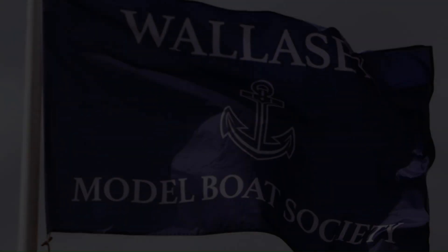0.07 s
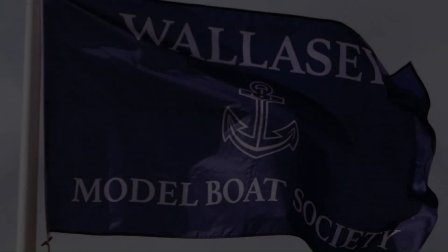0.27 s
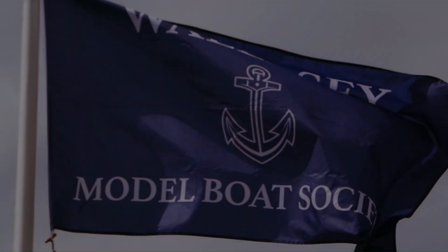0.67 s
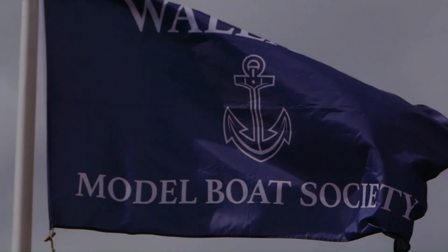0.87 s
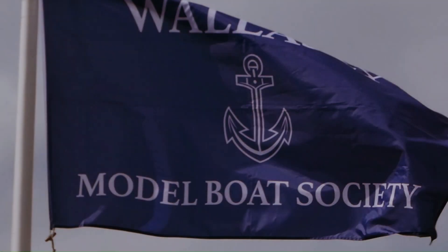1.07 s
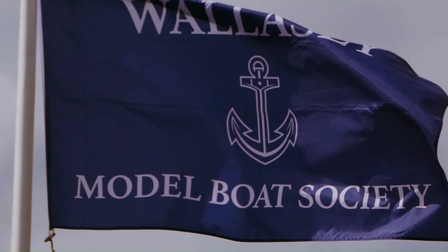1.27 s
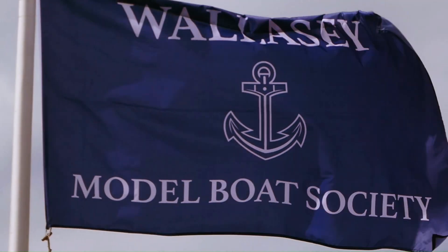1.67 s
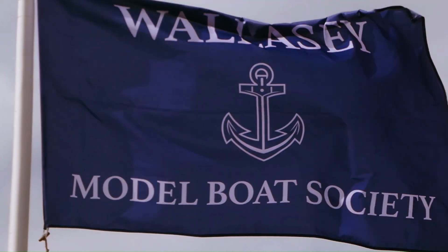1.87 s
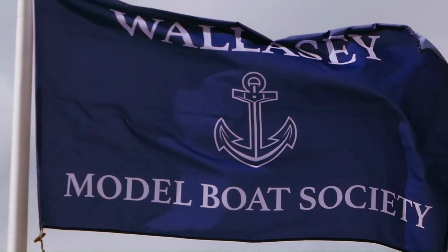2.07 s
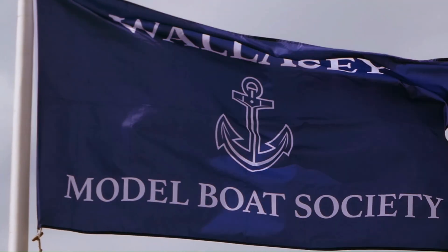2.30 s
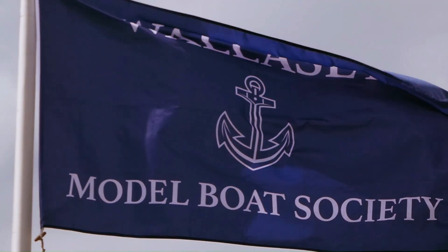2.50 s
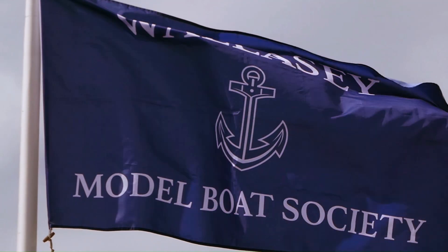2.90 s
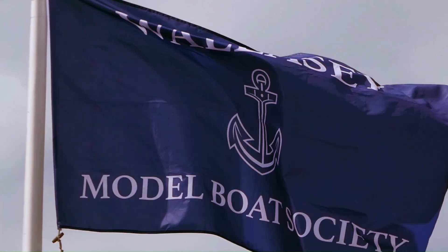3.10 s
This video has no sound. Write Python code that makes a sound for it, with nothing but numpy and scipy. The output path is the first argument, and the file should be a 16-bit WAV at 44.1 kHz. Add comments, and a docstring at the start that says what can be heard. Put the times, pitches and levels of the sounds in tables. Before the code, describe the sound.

A cloth flag flaps close by outdoors, with uneven soft thumps and flutter. It eases briefly, then flutters harder and snaps sharply near the end. Wind rumbles on the microphone under a faint hiss of air.

```python
"""Flag in a gusty wind

Outdoors, close to a cloth flag on its pole; wind buffets the stereo microphone, which pops once.
Each fold that whips taut sends out one pressure pulse (wide = a thump, narrow = a snap), then ripples on.
Small folds flutter in between, the cloth ticks, and air hisses along it.
The surroundings return a faint, dull scatter of the snaps and the flutter."""
import sys
import numpy as np
from scipy import signal
from scipy.io import wavfile

SR = 44100
rng = np.random.default_rng(int(sys.argv[2]) if len(sys.argv) > 2 else 0)


def transcribe(u):
    """Save the signal u as a 16-bit wav file named by the first command-line argument.

    u: samples, shape (n,) or (channels, n), limited to [-1, 1]; the rate is SR.
    q: integer samples, one column per channel.
    """
    v = np.clip(np.atleast_2d(u).T, -1, 1)
    q = np.round(v * 32767).astype(np.int16)
    wavfile.write(sys.argv[1], SR, q)


N = 143325

# Levels in the tables are relative; pan_db is left minus right.
# wind pressure at the microphone: time_s, level_db
GUST_LEVELS = [(0, -39.5), (.1, -46), (.3, -45.5), (.5, -46.5), (.62, -32), (.78, -39.5), (.97, -40.5),
               (1.15, -37), (1.35, -30.5), (1.53, -34.5), (1.68, -51.5), (1.77, -41.5), (2.03, -42.5),
               (2.22, -50), (2.34, -33), (2.42, -37.5), (2.6, -40.5), (2.72, -43), (2.95, -51), (3.14, -55),
               (3.19, -43.5), (3.25, -57)]
# spectrum of the rumble on the microphone: frequency_hz, density_db
RUMBLE_SPECTRUM = [(18, -7.5), (30, -14), (50, -29.5), (90, -21.5), (160, -52.5), (300, -60), (1000, -94),
                   (11000, -110)]
# spectrum of the eddies in strong gusts: frequency_hz, density_db
EDDY_SPECTRUM = [(20, -12), (60, 16.5), (110, -2.5), (200, -9), (400, -17), (1000, -31), (11000, -51)]
# rush of air along the cloth: time_s, level_db
RUSH_LEVELS = [(0, -64), (.2, -61), (.31, -59.5), (.37, -55), (.47, -58.5), (.6, -58.5), (.72, -54.5),
               (.83, -55.5), (.98, -51.5), (1.11, -56), (1.18, -52.5), (1.26, -56.5), (1.32, -53.5),
               (1.43, -56), (1.52, -53.5), (1.68, -61), (1.93, -55.5), (2.08, -59), (2.27, -56.5),
               (2.36, -48.5), (2.47, -53), (2.65, -55), (2.76, -49.5), (2.86, -54.5), (2.93, -52.5),
               (2.952, -41.5), (3.02, -59), (3.17, -57), (3.25, -55.5)]
# spectrum of that rush: frequency_hz, density_db
RUSH_SPECTRUM = [(30, 24), (400, 0), (1000, 5.5), (2000, 1.5), (3500, 1), (5500, -1), (8000, 1),
                 (11000, -2.5)]
# fluttering of the small folds: time_s, level_db
FLUTTER_LEVELS = [(0, -50.5), (.1, -42), (.3, -46), (.37, -34), (.43, -56), (.49, -44), (.56, -55),
                  (.95, -50), (1.08, -42), (1.35, -41.5), (1.58, -49), (1.7, -62), (2.27, -55),
                  (2.35, -26.5), (2.55, -40.5), (2.77, -33.5), (2.9, -30.5), (3.02, -37.5), (3.16, -43.5),
                  (3.25, -42)]
# four sizes of small fold: rise_ms, level_db
SMALL_FOLDS = [(.18, -23.5), (.32, 9.5), (.55, 10), (1.0, 16.5)]
# spectrum of the rustle under the flutter: frequency_hz, density_db
RUSTLE_SPECTRUM = [(30, 21), (100, -8), (230, 7.5), (450, -12), (900, -21), (1800, -39), (4000, -58),
                   (11000, -38)]
# sharp cloth ticks, and one microphone pop on the left at 2.35 s: start_s, level_db, pan_db, cutoff_hz
TICKS_AND_MIC_POP = [(1.356, -19.5, 4, 2370), (2.3545, -25.5, 24, 9800), (2.5965, -37, 3, 2480),
                     (2.7388, -34, -1, 3940), (2.7409, -24, 6, 2000), (2.788, -27, 0, 4070),
                     (2.945, -24, 0, 4000), (2.9476, -15.5, 0, 6800), (2.9567, -14, -3, 3500)]
# folds whipping taut: time_s, level_db, rise_ms, pan_db, ripple_db, suction_rises (length in rise times)
TAUT_FOLDS = [(0.0903, -42.5, 0.68, 17, -5, 2.3), (0.1733, -29, 0.47, 3, -31, 4),
              (.193, -22.5, 0.65, 1.5, -12, 12), (0.2059, -26, 1.36, 0, -12, 6.4),
              (0.2226, -29.5, 0.51, 3, -11.5, 1.3), (0.3563, -32.5, 0.51, 0, -5, 3.3),
              (.4005, -12, 1.16, -4, -21, 9.7), (.466, -22.5, 0.82, 3, -8.5, 6),
              (.5922, -27.5, 0.52, 4, -15, 7.9), (.7102, -20, 0.44, 2, -19, 4.5),
              (.7245, -15, 1.35, -2, -13, 3.8), (.847, -23, 1.18, -7.5, -15, 1.7),
              (0.8537, -31.5, 0.54, 3, -17, 1.4), (.952, -22, 1, 4, -34, 5.6),
              (.9818, -9.5, 1.43, 1, -16.5, 12), (1.1388, -12.5, 1.11, 3, -30, 0.97),
              (1.2023, -9, 1.26, -2, -19.5, 5.7), (1.2633, -34, 1.1, 10, -26, 3),
              (1.3743, -28.5, 0.52, 1, -13, 2.4), (1.3821, -31.5, 0.39, -6, -17.5, 2.5),
              (1.467, -28, 0.6, 1, -16.5, 1), (1.971, -37, 0.41, 0, -16, 2.3),
              (2.003, -32.5, 0.33, -2.5, -18, 0.87), (2.0178, -29, 0.45, 0, -21, 3.1),
              (2.107, -29.5, 1.34, -2.5, -8.5, 1.7), (2.158, -34, 1.8, 3, -22, 1.7),
              (2.31, -32, 0.32, 2, -9.5, 3.5), (2.3645, -31.5, 0.36, 17.5, -10, 5.9),
              (2.4018, -25.5, 0.27, -3.5, -16, 3.7), (2.4509, -16.5, 0.46, 3, -13.5, 4),
              (2.5263, -30.5, 0.26, -5, -21, 3), (2.5805, -25, 0.49, -1.5, -7.5, 3.4),
              (2.5915, -26, 0.27, 2, -12, 3), (2.5965, -18.5, 0.2, 3.5, -28.5, 12),
              (2.6433, -24.5, .4, -6.5, -24, 4), (2.6983, -8, 0.62, 2.5, -14, 1.22),
              (2.7297, -33, 0.54, 8, -15, 3.5), (2.7391, -24, 0.13, 6, -18, 0.96),
              (2.756, -30, 0.37, -2, -20, 3.5), (2.7864, -24, 0.17, -2, -23, 7.7),
              (2.9434, -1.5, 0.33, 2, -18.5, 2.5), (2.955, -9.5, 0.41, -9, -23.5, 12),
              (2.9729, -18.5, 1.1, -1, -4.5, 2.4), (2.9863, -20, 0.96, 4, -20, 1.9),
              (3.0892, -34.5, 0.22, -2, -17, 12), (3.1305, -31, 0.39, -8.5, -34, 3.6),
              (3.2169, -37, 0.13, -4, -13, 5.2)]

CUTOFF_HZ, PEAK_LIMIT = 11000, 1.7
RUMBLE_DB, SWAY_DB, SWAY_HZ, RUSH_DB = 4.5, 19, 6.87, 2
EDDIES_DB, EDDIES_GROWTH = -43, 1.1   # level in the strongest gust; dB per dB of gust
SCATTER_DB, SCATTER_DELAY_S, SCATTER_DECAY_S, SCATTER_CUT_HZ = -20, 0.015, 0.14, 3500
FOLDS_PER_S, FOLD_SPREAD_DB, FOLDS_DB, RUSTLE_DB = 190, 3.5, -2.5, -5.5
TICK_DECAY_S, TICK_LOW_HZ = 0.00008, 790
CRACK_HZ, CRACK_DECAY_S, CRACK_DB = 2860, 0.00053, -6.5   # bite of a tick
FALL_SPEED = 1.73   # a pulse falls this much faster than it rises
RIPPLE_ATTACK_S, RIPPLE_DECAY_S, RIPPLE_WIDENS = 0.00067, 0.032, 1.047
SUCTION_RISES = 8.8   # suction after a ripple or small fold, in rise times
RING_HZ, RING_DECAY_S, RING_DB = 393, 0.0048, -6.5   # taut cloth


def from_db(db):
    """Decibels to gain."""
    return 10 ** (np.asarray(db) / 20)


def rms_one(x):
    """Scale to unit rms."""
    return x / np.sqrt(np.mean(x ** 2) + 1e-20)


def level(rows):
    """Gain at every sample from rows of time_s, level_db."""
    time_s, level_db = np.transpose(rows)
    return from_db(np.interp(np.arange(N) / SR, time_s, level_db))


def butter(x, hz, kind, order=2):
    """Causal Butterworth filter."""
    return signal.sosfilt(signal.butter(order, hz, kind, fs=SR, output="sos"), x + 1e-18)


def resonance(x, hz, decay_s):
    """Brief ring; gain 1 at its pitch."""
    r = np.exp(-1 / (decay_s * SR))
    feedback = [1, -2 * r * np.cos(2 * np.pi * hz / SR), r * r]
    return signal.lfilter((1 - r * r) / 2 * np.array([1, 0, -1]), feedback, x)


def drift(rate_hz):
    """Slow random motion of spread 1."""
    hop, settle = 40, 2000
    r = np.exp(-2 * np.pi * rate_hz * hop / SR)
    white = rng.standard_normal(N // hop + settle + 2)
    slow = signal.lfilter([1], [1, -2 * r, r * r], white)[settle:]
    return np.interp(np.arange(N) / hop, np.arange(len(slow)), rms_one(slow))


def add(out, start_s, sound, pan_db):
    """Mix a mono or stereo sound in at a time and a direction."""
    i = max(int(start_s * SR), 0)
    part = (sound * from_db([[pan_db / 2], [-pan_db / 2]]))[:, :N - i]
    out[:, i:i + part.shape[1]] += part


def banded_noise(spectrum, alike, flicker_db, flicker_hz):
    """Half-octave bands of stereo noise that flicker partly together; rms 1, mono when alike is 1."""
    edges = 16 * 2 ** np.arange(0, 10.1, .5)
    hz, db = np.transpose(spectrum)
    white = rng.standard_normal((2, 2, N + SR))
    together = drift(flicker_hz)
    out = 0
    for k, (low, high) in enumerate(zip(edges, edges[1:])):
        mid, side = butter(white[k % 2], [low, high], "band")[:, SR:]
        band_db = np.interp(np.log(low * high) / 2, np.log(hz), db)
        gain = from_db(band_db + flicker_db * (together + drift(flicker_hz)))
        out = out + gain * (np.sqrt(1 + alike) * mid + np.sqrt(1 - alike) * side * [[1], [-1]])
    return rms_one(out)


def microphone_wind():
    """Wind on the microphone: deep rumble, a slow sway of pressure, and eddies in strong gusts."""
    gust = level(GUST_LEVELS)
    rumble = banded_noise(RUMBLE_SPECTRUM, alike=0.12, flicker_db=2.0, flicker_hz=23)
    eddies = banded_noise(EDDY_SPECTRUM, alike=1, flicker_db=1.5, flicker_hz=36)
    eddies *= (gust / gust.max()) ** EDDIES_GROWTH
    pressure = drift(SWAY_HZ) + 0.86 * np.array([drift(SWAY_HZ), drift(SWAY_HZ)])
    sway = rms_one(butter(pressure, [3, 16], "band"))
    return gust * (from_db(RUMBLE_DB) * rumble + from_db(SWAY_DB) * sway) + from_db(EDDIES_DB) * eddies


def outdoors(close):
    """The close sound plus a faint, dull scatter back from the surroundings."""
    t = np.arange(SR // 2) / SR
    scatter = rng.standard_normal((2, len(t))) * np.exp(-t / SCATTER_DECAY_S) * (t > SCATTER_DELAY_S)
    scatter /= np.linalg.norm(scatter[0])
    far = signal.fftconvolve(butter(close, SCATTER_CUT_HZ, "low"), scatter, axes=1)[:, :N]
    return close + from_db(SCATTER_DB) * far


def air_rush():
    """Air rushing along the cloth: a hiss, wide in the stereo image."""
    hiss = banded_noise(RUSH_SPECTRUM, alike=0.26, flicker_db=1.52, flicker_hz=9.4)
    return from_db(RUSH_DB) * level(RUSH_LEVELS) * hiss


def fold_pulse(rise_ms, suction_rises):
    """Pressure from one fold swells, collapses and leaves a suction; height 1, centred in 80 ms."""
    rises = np.arange(-.04, .04, 1 / SR) * 1000 / rise_ms
    corner_hz = 1000 / (2 * np.pi * rise_ms)
    swell = np.exp(-np.logaddexp(-rises, FALL_SPEED * rises))
    swell = butter(swell, min(4.84 * corner_hz, CUTOFF_HZ), "low", order=4)   # softens the edge
    wave = butter(swell, corner_hz / suction_rises, "high", order=1)   # the undershoot is the suction
    return wave / wave.max()


def flutter():
    """Small folds flip at random over a soft rustle."""
    folds = 0
    for rise_ms, size_db in SMALL_FOLDS:
        flips = rng.random(N) < FOLDS_PER_S / len(SMALL_FOLDS) / SR
        sizes = from_db(size_db + FOLD_SPREAD_DB * np.clip(rng.standard_normal(N), -2, 2))
        signs = rng.choice([-1, 1], N)
        channel_gains = from_db(2.2 * rng.standard_normal((2, N)))
        kicks = flips * sizes * signs * channel_gains
        folds += signal.fftconvolve(kicks, fold_pulse(rise_ms, SUCTION_RISES)[None], "same", axes=1)
    rustle = banded_noise(RUSTLE_SPECTRUM, alike=0.93, flicker_db=2.5, flicker_hz=75)
    return level(FLUTTER_LEVELS) * (from_db(FOLDS_DB) * rms_one(folds) + from_db(RUSTLE_DB) * rustle)


def ticks_and_mic_pop():
    """Cloth ticks and one microphone pop: each a sharp step with a very short ring."""
    out, t = np.zeros((2, N)), np.arange(SR // 50) / SR
    step = butter(np.exp(-t / TICK_DECAY_S), TICK_LOW_HZ, "high", order=1)
    tick = step + from_db(CRACK_DB) * resonance(step, CRACK_HZ, CRACK_DECAY_S)
    for start_s, level_db, pan_db, cutoff_hz in TICKS_AND_MIC_POP:
        add(out, start_s, from_db(level_db) * butter(tick, cutoff_hz, "low"), pan_db)
    return out


def snaps():
    """Folds whip taut near the microphone: one pulse each, a brief ring, then slower, dying ripples."""
    out, t = np.zeros((2, N)), np.arange(SR // 4) / SR
    dying = np.exp(-t / RIPPLE_DECAY_S) * (1 - np.exp(-t / RIPPLE_ATTACK_S))
    for time_s, level_db, rise_ms, pan_db, ripple_db, suction_rises in TAUT_FOLDS:
        pulse = fold_pulse(rise_ms, suction_rises)
        # the shorter the suction, the more the cloth rings
        ring = from_db(RING_DB) / suction_rises ** 2 * resonance(pulse, RING_HZ, RING_DECAY_S)
        ripple = fold_pulse(rise_ms * RIPPLE_WIDENS, SUCTION_RISES)
        ripple /= np.linalg.norm(ripple)
        shaking = dying * (rng.standard_normal(len(t)) + 0.27 * rng.standard_normal((2, len(t))))
        sound = from_db(ripple_db) * signal.fftconvolve(shaking, ripple[None], axes=1)
        sound[:, :len(pulse)] += pulse + ring
        add(out, time_s - len(pulse) / 2 / SR, from_db(level_db) * sound, pan_db)
    return out


def scene():
    """Rushing air, the flag close by in the open, and wind on the microphone."""
    return air_rush() + outdoors(snaps() + flutter()) + ticks_and_mic_pop() + microphone_wind()


def record(dry):
    """The tallest peaks are rounded and the top is cut steeply."""
    rounded = PEAK_LIMIT * np.tanh(dry / PEAK_LIMIT)
    return signal.sosfilt(signal.ellip(12, .2, 70, CUTOFF_HZ, fs=SR, output="sos"), rounded)


dry = scene()
out = record(dry)
transcribe(out)
```